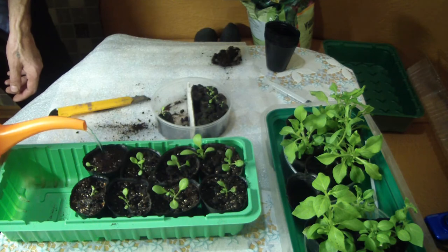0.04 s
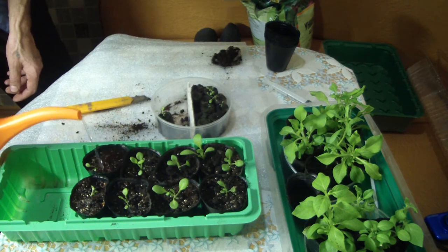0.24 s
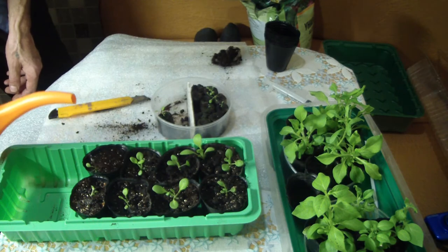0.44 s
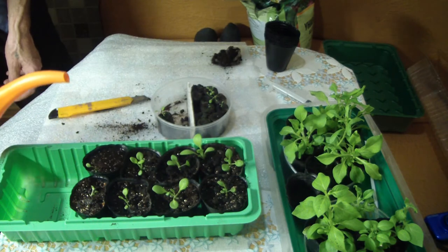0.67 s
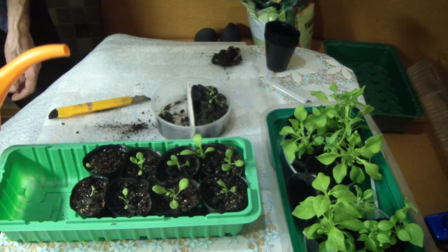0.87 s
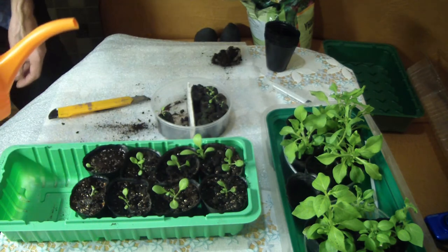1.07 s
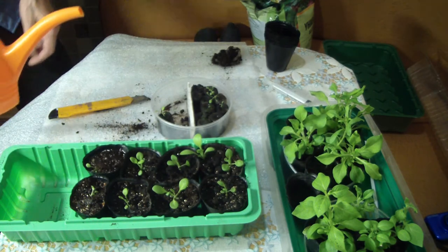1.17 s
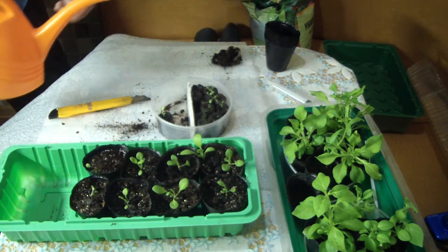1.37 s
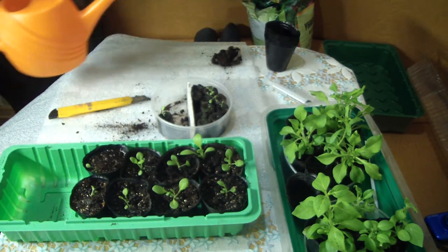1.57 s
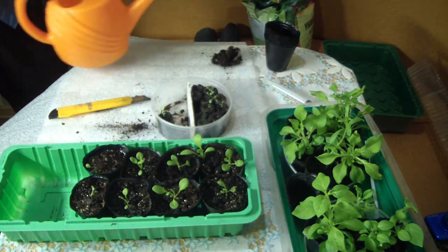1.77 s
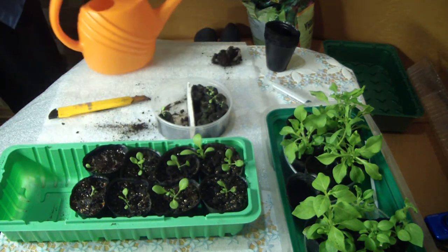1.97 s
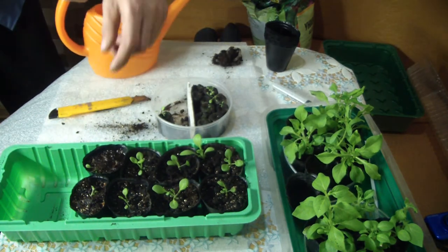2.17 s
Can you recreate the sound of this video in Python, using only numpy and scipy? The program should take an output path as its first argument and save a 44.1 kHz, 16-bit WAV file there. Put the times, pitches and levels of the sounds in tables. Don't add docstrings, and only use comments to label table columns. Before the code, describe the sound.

A plastic watering can scrapes and knocks sharply on a hollow tray close to the microphone, rattles, a few drops tick, then faint cloth rustle and a soft sliding thud on a covered table, over room hiss.

```python
import sys
import numpy as np
from scipy import signal
from scipy.fft import rfft, irfft
from scipy.io import wavfile
from scipy.ndimage import uniform_filter1d

SR = 44100
rng = np.random.default_rng(int(sys.argv[2]) if len(sys.argv) > 2 else 0)


def how_loud(loudness_db):
    steps = np.asarray(loudness_db, float) / 20
    return 10 ** steps


def transcribe(u):
    v = np.clip(np.atleast_2d(u).T, -1, 1)
    q = np.round(v * 32767).astype(np.int16)
    wavfile.write(sys.argv[1], SR, q)


N = 97990

# frequency_hz, level_db
AIR_SPECTRUM = [(8.8, -8), (15, 3), (174, -2), (253, -6.5), (510, -5.5), (1950, -14), (2770, -13.5),
                (14600, -23), (15900, -27)]
AIR_DB = -48.5
# frequency_hz, likeness (0-1)
AIR_LIKENESS = [(60, 0.44), (180, 0.13), (550, 0.49), (1650, 0.46), (4970, 0.13), (15000, 0.071)]
AIR_LEAN_DB, NEAR_LEAN_DB = -1, -2
# pitch_hz, level_db, width_hz
HUM_TONES = [(29.8, -60.5, 24), (188, -66, 29), (284.6, -64, 31), (525, -64.5, 3.3), (715, -67, 82),
             (818, -79.5, 3.5), (897, -65.5, 21), (958, -63, 6.7), (1002, -67, 24), (1434, -67, 32),
             (2726, -71.5, 33),
             (484, -63, 9), (497, -62, 14)]
# centre_s, pitch_hz, level_db, length_s
HUM_SWELLS = [(.66, 485, -57, .03), (.78, 490, -56, .05), (.93, 488, -56, .04), (1.07, 497, -58, .04),
              (1.585, 497, -50, .03), (1.56, 903, -60, .05), (1.8, 903, -54, .035), (2.0, 540, -54, .04),
              (2.2, 503, -53, .03)]
WHINE_HZ, WHINE_DB = 15650, -67.5
FLUTTER_HZ, FLUTTER_DEPTH = 50, 0.5

# time_s, level_db
DRAG_LEVEL = [(.049, -60), (.054, -42), (.066, -46), (.095, -44), (.115, -50), (.128, -60)]
# start_s, level_db, hardness (0-1)
TOUCHES = [(.0515, -27, .5), (.057, -28, .5), (.0615, -27, .4), (.0705, -21, .12), (.079, -28, .1),
           (.087, -25, .05), (.0925, -22, .55), (.102, -21, .3), (.111, -25, .1), (.122, -28, .05),
           (.133, -34, .5)]
# start_s, level_db, hardness (0-1)
BLOWS = [
    (.1392, -11, 1.),
    (.1402, -6, 1.),
    (.1422, -12, .8),
]
# start_s, level_db, hardness (0-1)
RATTLES = [(.149, -19.5, 0.31), (.154, -15.5, 0.05), (.165, -15.5, 0.32), (0.176, -16.5, 0.35),
           (.190, -25.5, 0.73)]
# pitch_hz, level_db, t60_s
TRAY_MODES = [(305.6, -15, 0.072), (398.3, -10, 0.077), (454, -11, 0.064), (556, -13, 0.069),
              (788, -7, .085), (839.5, -5, 0.076), (891, -8.5, 0.079), (981, -10.5, 0.056),
              (1087, -11.5, 0.057), (1190, -11.5, 0.077), (1822, -6.5, 0.025), (2100, -10.5, 0.044),
              (3760, -9.5, 0.038), (4605, -11.5, 0.03)]
# frequency_hz, level_db (per Hz)
WALL_SPECTRUM = [(88, -48), (150, -36.5), (572, 1.5), (638, -5), (767, -6.5), (2670, -9.5), (2920, -17),
                 (6200, -20), (12000, -62), (15600, -71), (22000, -120)]
WALL_DB, WALL_T60_S = -3.5, 0.044
# frequency_hz, level_db (per Hz)
CRACK_SPECTRUM = [(300, -29), (1070, -1), (2600, 4), (3700, 14.5), (6300, 12), (8000, 9.5), (10500, -6.5),
                  (15500, -25)]
CRACK_DB, CRACK_T60_S = 4, 0.0062
SOFT_HZ, HARD_HZ = 910, 9300
BODY_DB, LOW_CUT_HZ = -5, 160

# start_s, level_db, t60_s
GRIT_TICKS = [(0.05, -46, .01), (0.0526, -40.5, 0.013), (0.054, -40, .02), (.0585, -38, 0.021),
              (0.059, -40, .02), (0.0702, -37, 0.014), (0.075, -43, .02), (.079, -43, .015),
              (0.084, -51, .02), (.089, -43, 0.012), (0.0936, -34, 0.0095), (.0965, -43, .02),
              (0.105, -51, 0.025)]
# frequency_hz, level_db (per Hz)
GRIT_SPECTRUM = [(1000, -7), (2500, 9), (4000, -3), (6500, -2), (9000, -2.5), (12000, -10), (15500, -16)]

# frequency_hz, t60_s
ROOM_T60 = [(150, 0.4), (500, 0.25), (1500, 0.2), (4000, 0.17), (9000, 0.22), (15000, 0.32)]
# frequency_hz, level_db
ROOM_RETURN = [(200, 1), (1000, -0.5), (4000, 3), (8000, -5.5), (11000, -6.5), (16000, -4.5)]
ROOM_DB, ROOM_SHARE = -2.5, 0.8
TABLE_ECHO_S = [0.00039, .0006]
TABLE_ECHO_DB = -11.5

# start_s, level_db, pitch_hz, t60_s
BUMPS = [(.068, -33, 190, .15), (.17, -42, 130, .2), (.175, -38, 230, .15), (1.39, -51, 180, .15),
         (1.58, -51, 90, .2), (1.955, -47, 185, .15), (1.99, -38.5, 305, .12), (2.14, -49, 95, .15),
         (2.15, -46, 60, .2)]
# level_db, pitch_hz, rise_s, t60_s
TABLE_THUD = (-27.5, 39, .028, .25)
THUD_S = 2.048

# start_s, level_db, pitch_hz, t60_s
TAPS = [(.0711, -21, 520, .016), (.0878, -27, 380, .012), (.1022, -26, 820, .03), (.1399, -13, 680, .006),
        (.1402, -12, 7300, .0035), (1.2085, -44, 175, .03), (1.222, -45, 175, .03)]
# start_s, level_db, pitch_hz, t60_s
DROPS = [(0.264, -40, 11000, .001), (0.2687, -34, 8400, 0.00077), (.2715, -42, 14000, .004),
         (.2727, -38, 11000, .001), (0.2736, -39, 2490, 0.012), (.305, -38, 8400, 0.002),
         (.305, -28.5, 2010, 0.0059), (0.3337, -28.5, 11100, 0.0007), (0.3337, -33, 4500, 0.0012),
         (0.334, -34.5, 7620, 0.0044), (0.3335, -54, 2100, 0.0037), (0.338, -32.5, 6400, 0.0022),
         (.351, -41, 6650, 0.0064)]

# centre_s, level_db, length_s
STIRS = [(.5, -61, .06), (.68, -62, .04), (.95, -58, .06), (1.055, -51, .03), (1.26, -60, .03),
         (1.415, -55, .018), (1.59, -53, .035), (1.745, -56, .02), (1.87, -56, .03)]
# frequency_hz, level_db (per Hz)
STIR_SPECTRUM = [(300, -15), (1000, -11), (2500, -3.5), (5000, -6.5), (10000, -11.5), (15800, -19)]
# time_s, level_db
SLIDE_LEVEL = [(1.95, -64), (1.956, -61), (1.97, -43), (1.99, -37.5), (2.034, -32.5), (2.098, -43.5),
               (2.148, -44), (2.18, -50), (2.22, -50)]
# frequency_hz, level_db (per Hz)
SLIDE_SPECTRUM = [(80, -15), (163, 0), (522, -3), (797, -8.5), (2000, -5), (4340, -4.5), (7000, -5),
                  (14300, -10), (15800, -18)]
FIBRES_PER_S, FIBRE_DB = 8000, 1.2
RUB_S, RUB_LENGTH_S = 2.026, 0.017
RUB_HZ, RUB_WIDTH_HZ, RUB_DB = 4350, 900, -6
EDGE_HZ = 15765


def evened(x):
    return x / np.sqrt(np.mean(x ** 2) + 1e-20)


def read(points, hz):
    f, value = np.transpose(points)
    return np.interp(np.log(hz + 1), np.log(f + 1), value)


def curve(points):
    s, db = np.transpose(points)
    return how_loud(np.interp(np.arange(N) / SR, s, db, -120, db[-1]))


def swell(centre_s, length_s):
    return np.exp(-((np.arange(N) / SR - centre_s) / length_s) ** 2 / 2)


def colour(x, points):
    gain = how_loud(read(points, np.fft.rfftfreq(x.shape[-1], 1 / SR)))
    return irfft(rfft(x) * gain, x.shape[-1])


def add(mix, s, sound):
    part = mix[round(s * SR):][:len(sound)]
    part += sound[:len(part)]


def resonate(x, hz, width_hz):
    r = np.exp(-np.pi * width_hz / SR)
    return signal.lfilter([1 - r], [1, -2 * r * np.cos(2 * np.pi * hz / SR), r * r], x)


def room_tone():
    frames, hz = N // 256 + 5, np.fft.rfftfreq(2048, 1 / SR)
    a, b, c, d, patches = rng.standard_normal((frames // 2 + 4, 1025, 5)).T
    patches = uniform_filter1d(uniform_filter1d(patches, 20, axis=0), 5, axis=1)
    likeness = np.clip(read(AIR_LIKENESS, hz), -1, 1)[:, None]
    left = a + 1j * b
    right = likeness * left + np.sqrt(1 - likeness ** 2) * (c + 1j * d)
    gain = how_loud(read(AIR_SPECTRUM, hz)[:, None] + 0.12 * evened(patches))
    hiss = signal.istft(np.array([left, right]) * gain, nperseg=2048, noverlap=1536)[1][:, :N]
    return how_loud(AIR_DB - 0.5) * evened(hiss)


def appliance_hum():
    out, t = np.zeros(N), np.arange(N) / SR
    for hz, db, width_hz in HUM_TONES:
        settled = resonate(rng.standard_normal(N + SR), hz, width_hz)[SR:]
        out += how_loud(db) * evened(settled)
    for s, hz, db, length_s in HUM_SWELLS:
        out += how_loud(db) * np.sqrt(2) * swell(s, length_s) * np.sin(2 * np.pi * hz * t)
    return out


def whine():
    t = np.arange(N) / SR
    flutter = 1 + FLUTTER_DEPTH * np.cos(2 * np.pi * FLUTTER_HZ * t)
    return how_loud(WHINE_DB) * np.sqrt(2) * np.sin(2 * np.pi * WHINE_HZ * t) * flutter


def air():
    return (room_tone() + appliance_hum() + whine()) * how_loud([[AIR_LEAN_DB / 2], [-AIR_LEAN_DB / 2]])


def tray():
    out, t = np.zeros(N), np.arange(4096) / SR
    modes = np.zeros(len(t))
    for k, (hz, db, t60) in enumerate(TRAY_MODES):
        modes += how_loud(db - 60 * t / t60) * np.sin(2 * np.pi * hz * t + k)
    wall_decay = how_loud(WALL_DB - 60 * t / WALL_T60_S)
    for s, db, hard in BLOWS + TOUCHES + RATTLES:
        noise, patch = rng.standard_normal((2, len(t)))
        corner_hz = SOFT_HZ * (HARD_HZ / SOFT_HZ) ** np.clip(hard, 0, 1)
        push = t[:200] * np.exp(-2 * np.pi * corner_hz * t[:200])
        body = modes + wall_decay * evened(colour(patch, WALL_SPECTRUM))
        add(out, s, how_loud(db + BODY_DB) * np.convolve(body, push / push.sum()))
        crack = hard ** 2 * evened(colour(noise, CRACK_SPECTRUM)) / 2
        add(out, s, how_loud(db + CRACK_DB - 60 * t / CRACK_T60_S) * crack)
    slips = rng.standard_normal(N) * (rng.random(N) < 500 / SR)
    dragging = np.arange(N) < DRAG_LEVEL[-1][0] * SR
    out += signal.oaconvolve(slips * curve(DRAG_LEVEL) * dragging, modes)[:N]
    return signal.sosfilt(signal.butter(2, LOW_CUT_HZ, "high", fs=SR, output="sos"), out)


def grit():
    out, t = np.zeros(N), np.arange(2048) / SR
    for s, db, t60 in GRIT_TICKS:
        noise = rng.standard_normal(len(t))
        add(out, s, how_loud(db - 60 * t / t60) * evened(colour(noise, GRIT_SPECTRUM)))
    return out


def table_echo(near):
    bright = np.diff(near, prepend=0)
    return how_loud(TABLE_ECHO_DB) * np.array([np.roll(bright, round(s * SR)) for s in TABLE_ECHO_S])


def room(x):
    taps = np.zeros((3, SR // 2))
    slots = np.arange(200, SR // 2 - 20, 20)
    at = slots + rng.integers(0, 20, (3, len(slots)))
    np.put_along_axis(taps, at, rng.choice([-1., 1.], at.shape), axis=1)
    own = colour(taps[1:], [(200, -26), (2000, -9.5), (9000, 3.5)])
    taps = colour(taps[0] + ROOM_SHARE * own, ROOM_RETURN)
    hz, t, z = signal.stft(taps, SR, nperseg=256)
    decay = how_loud(-60 * t / read(ROOM_T60, hz)[:, None])
    tail = signal.istft(z * decay, SR, nperseg=256)[1]
    return signal.fftconvolve(x[None], tail / np.linalg.norm(tail[0]), axes=1)[:, :N]


def thuds():
    out, t = np.zeros(N), np.arange(12000) / SR
    bumps = [(s, db, hz, 0.012, t60) for s, db, hz, t60 in BUMPS]
    for s, db, hz, rise, t60 in [(THUD_S, *TABLE_THUD)] + bumps:
        decay = how_loud(db - 60 * np.maximum(t - rise, 0) / t60)
        add(out, s, decay * np.minimum(t / rise, 1) * np.sin(2 * np.pi * hz * t))
    return out


def taps_and_drops():
    out, t = np.zeros(N), np.arange(1500) / SR
    for s, db, hz, t60 in TAPS + DROPS:
        decay = how_loud(db - 60 * np.maximum(t - t60 / 7, 0) / t60)
        onset = np.minimum(t * 15 / t60, 1)
        add(out, s, decay * onset * np.sin(2 * np.pi * hz * t * (1 + 8 * t)))
    return out


def rustle():
    snapping = rng.random(N) < FIBRES_PER_S / SR
    strength = 0.5 + snapping * how_loud(FIBRE_DB * rng.exponential(1, N))
    snaps = rng.standard_normal((3, N)) * strength
    x = snaps[0] + 0.36 * snaps[1:]
    flicker = how_loud(1.2 * evened(uniform_filter1d(rng.standard_normal(N), 150)))
    stirs = sum(how_loud(db) * swell(s, length_s) for s, db, length_s in STIRS)
    rub = evened(resonate(resonate(x, RUB_HZ, RUB_WIDTH_HZ), RUB_HZ, RUB_WIDTH_HZ))
    slide = evened(colour(x, SLIDE_SPECTRUM)) + how_loud(RUB_DB) * swell(RUB_S, RUB_LENGTH_S) * rub
    return flicker * (stirs * evened(colour(x, STIR_SPECTRUM)) + how_loud(-1.5) * slide * curve(SLIDE_LEVEL))


def scene():
    near = tray() + grit() + taps_and_drops()
    close = near + table_echo(near) + how_loud(ROOM_DB) * room(near) + rustle()
    lean = how_loud([[NEAR_LEAN_DB / 2], [-NEAR_LEAN_DB / 2]])
    return air() + lean * close + thuds() * how_loud([[-2.1], [1.6]])


def roll_off(x):
    return signal.sosfilt(signal.butter(12, 16820, fs=SR, output="sos"), x)


def record(dry):
    edge = signal.firwin(2001, EDGE_HZ, window=("kaiser", 7), fs=SR)
    mix = signal.oaconvolve(dry, edge[None], "same")
    return roll_off(mix)


dry = scene()
out = record(dry)
transcribe(out)
```